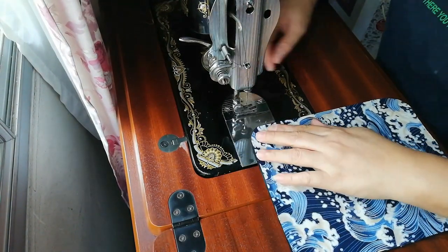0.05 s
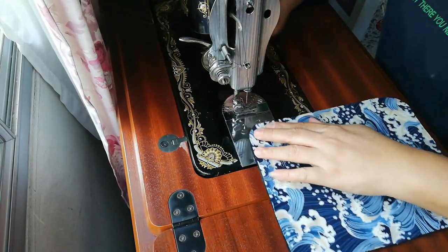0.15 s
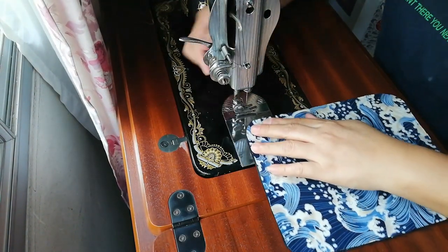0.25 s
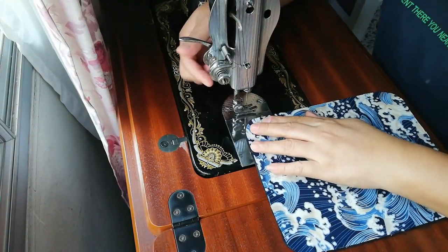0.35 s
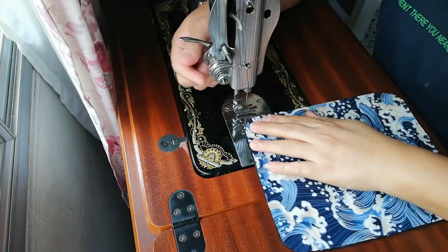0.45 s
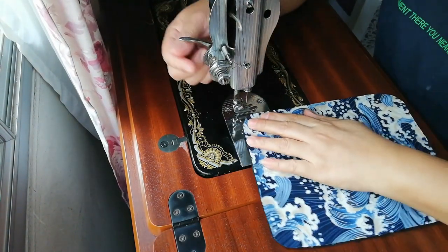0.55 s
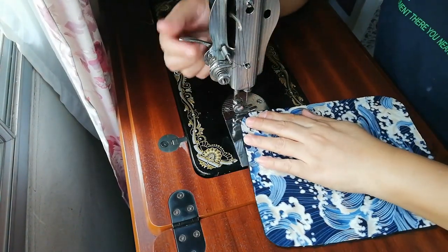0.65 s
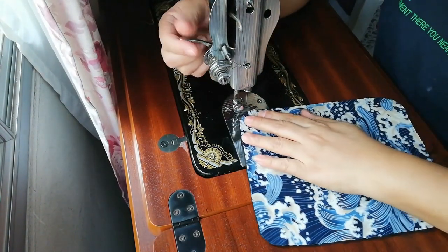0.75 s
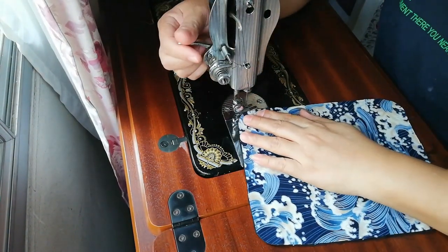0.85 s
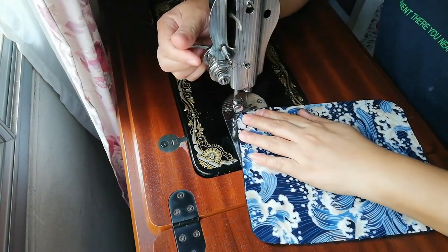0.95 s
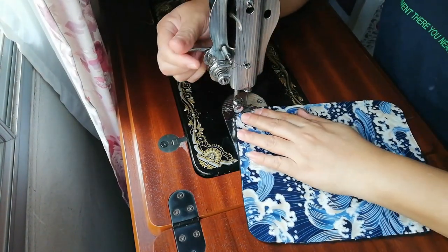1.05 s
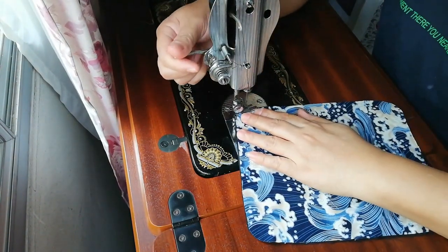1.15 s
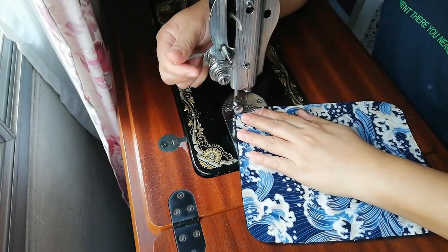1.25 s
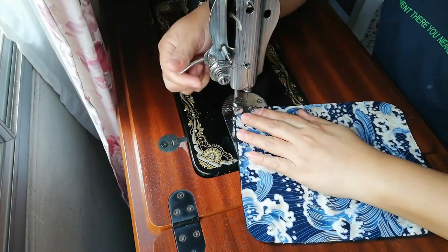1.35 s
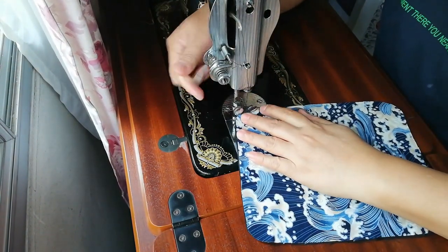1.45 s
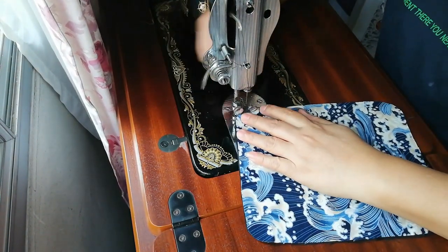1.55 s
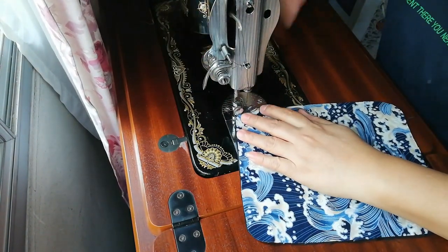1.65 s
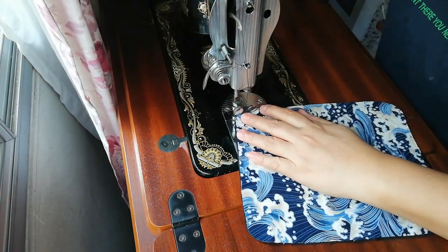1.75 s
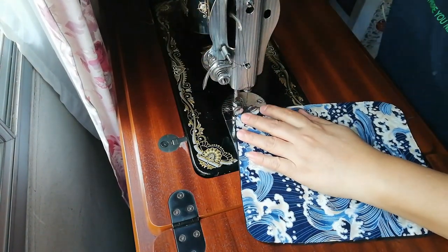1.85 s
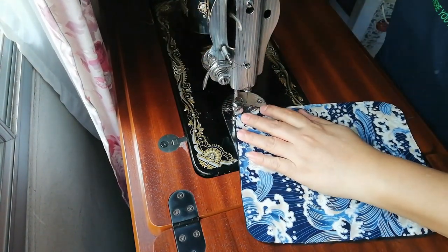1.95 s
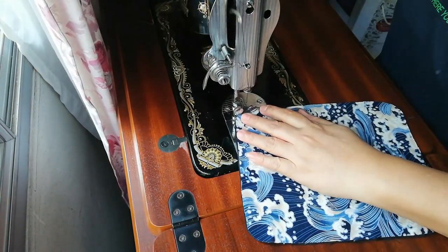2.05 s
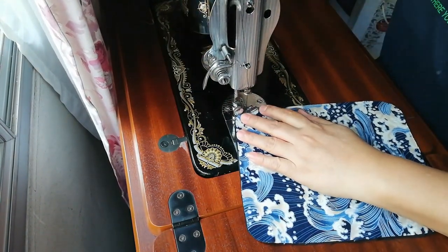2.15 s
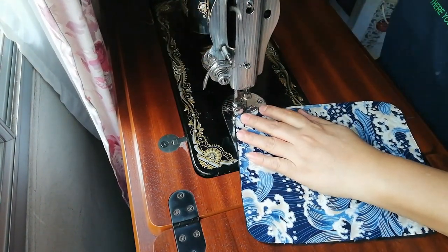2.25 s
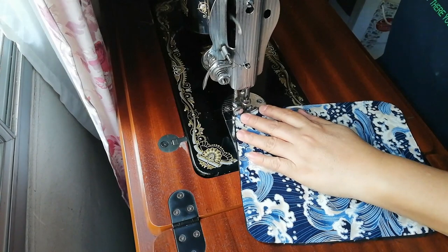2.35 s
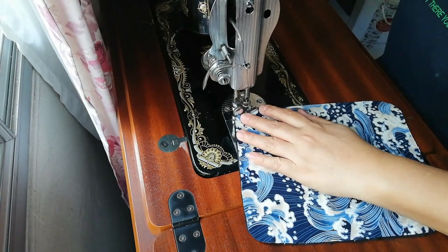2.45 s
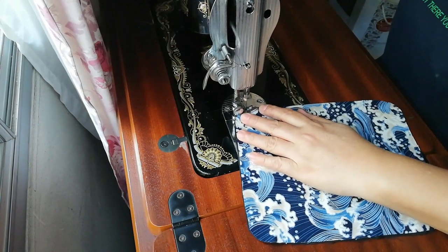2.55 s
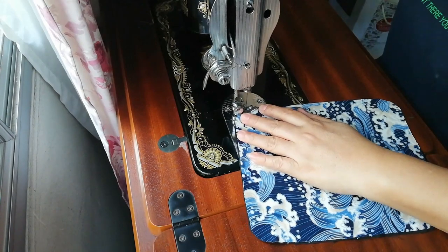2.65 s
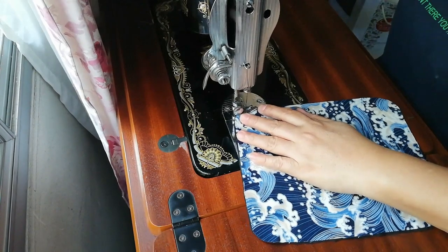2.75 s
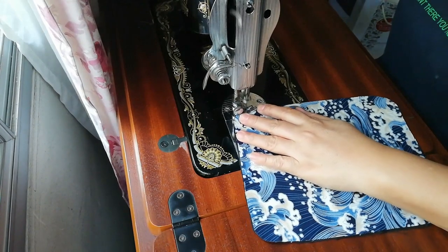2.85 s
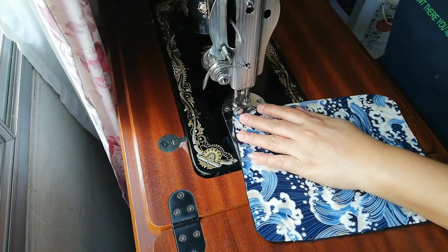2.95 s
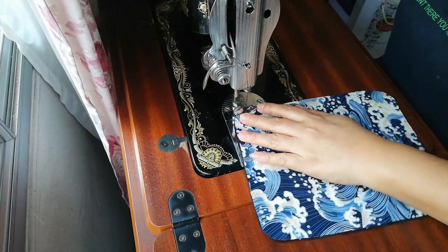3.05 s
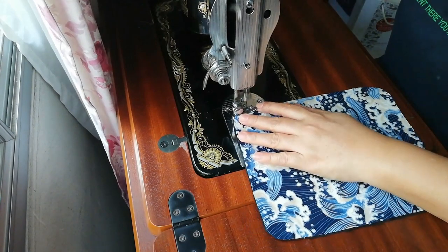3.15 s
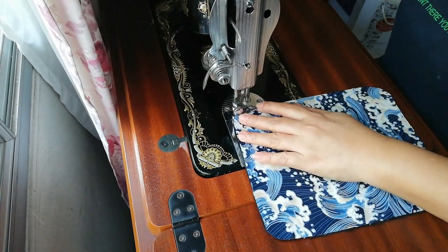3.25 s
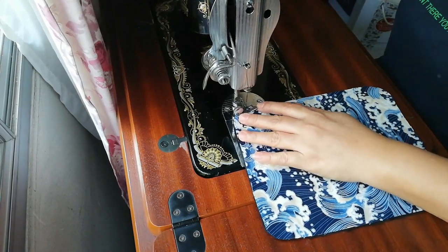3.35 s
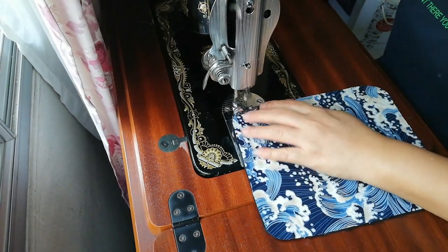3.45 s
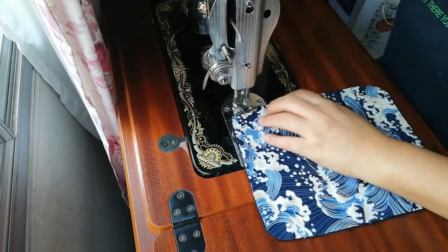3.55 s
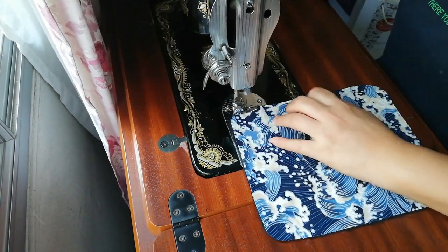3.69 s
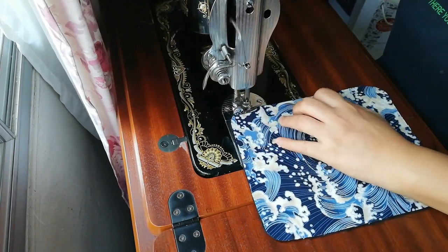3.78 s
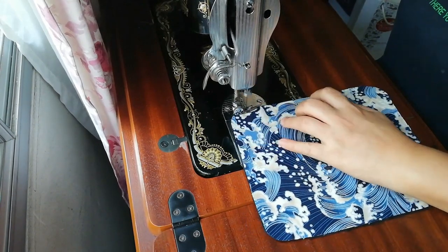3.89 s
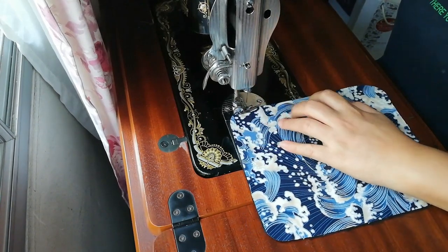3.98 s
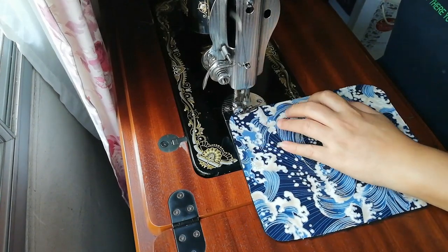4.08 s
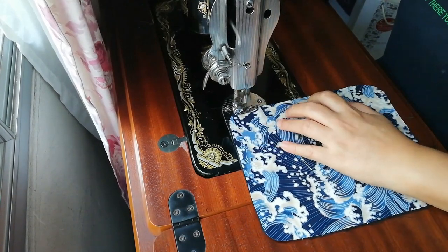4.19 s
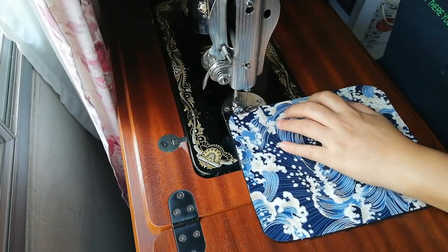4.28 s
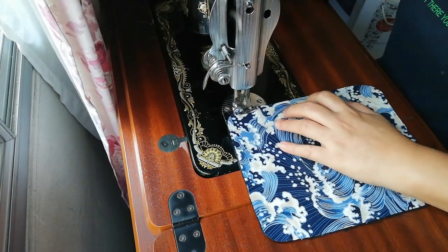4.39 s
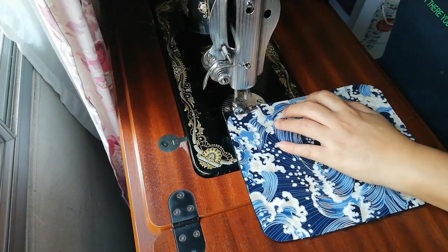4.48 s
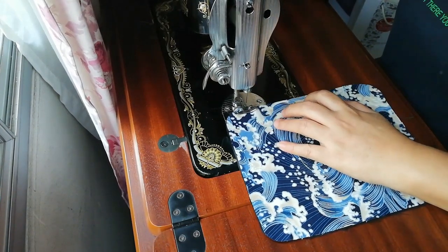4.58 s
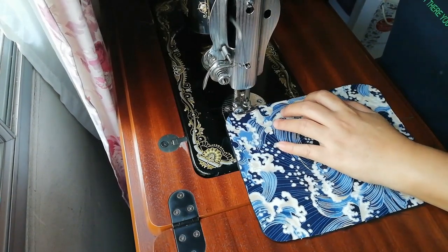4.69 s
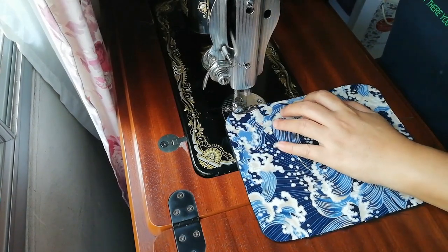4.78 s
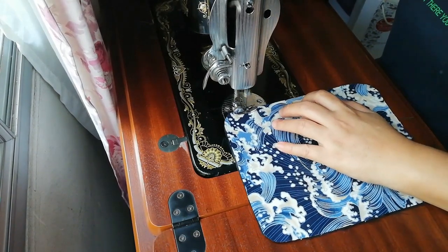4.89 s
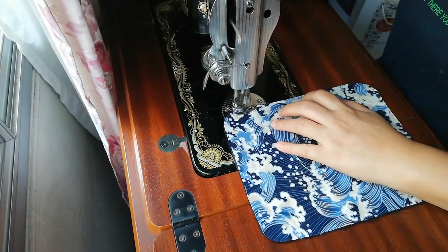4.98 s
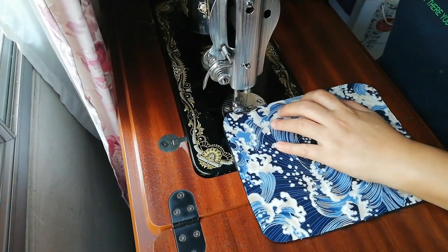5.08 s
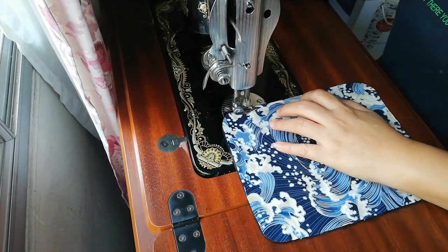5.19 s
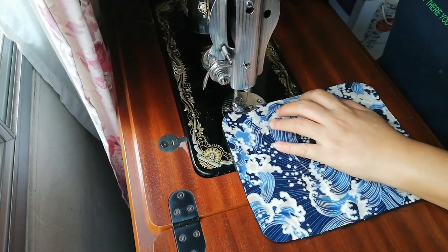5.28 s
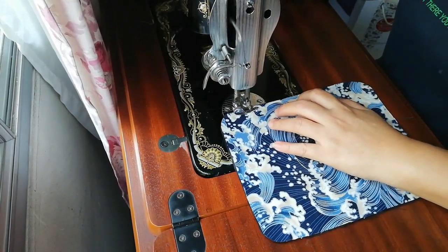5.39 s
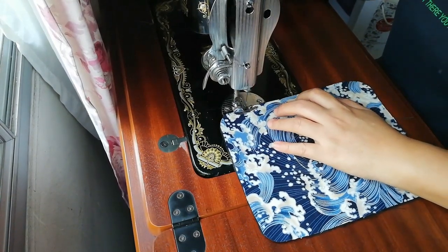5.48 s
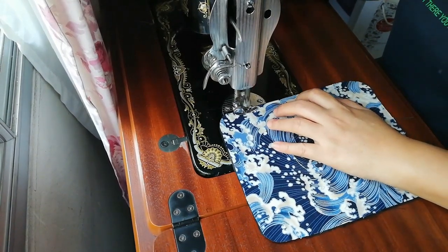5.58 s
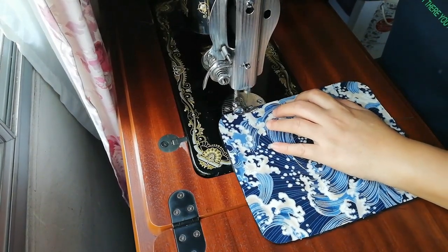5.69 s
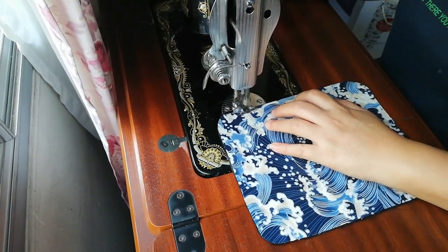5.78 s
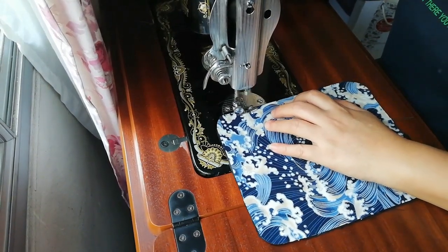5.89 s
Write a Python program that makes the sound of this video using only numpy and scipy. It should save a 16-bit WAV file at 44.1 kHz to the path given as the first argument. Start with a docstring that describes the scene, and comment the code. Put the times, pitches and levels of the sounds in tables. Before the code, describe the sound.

A quiet room with a steady soft hush and two low wavering hums, heard close in stereo. From 0 to 1.3 s a hand feels for a lever on an old iron sewing machine: a small tap at 0.5 s, a light brush near 0.7 s, faint ticks around 1.2 s. A tiny squeak leads to a loud, sharp metal clack at 1.46 s, with a weaker bounce at 1.54 s and a short ring. Near-silence follows until about 2.2 s, when the mechanism starts with faint, separate knocks and soft rasps. From 3 s the strokes become clear, bright metallic clicks and scratchy thread rasp over dull wooden thuds, about three stitches every second. The pace quickens and the clatter grows louder and brighter, reaching about five stitches a second after 5 s. Deep stand rumble swells underneath, with jolts near 3.3 and 5.2 s. The machine is still running at the end, near 5.9 s.

```python
"""An old cast-iron treadle sewing machine on a wooden table gathers speed, heard close by two microphones.
Its stitches are metal knocks and a rasp of thread and shuttle: rough noise and clicks that set metal ringing.
The table thuds underneath: low noise drives the resonances of the wood, and the stand shakes deeper still.
Before that a hand feels for the presser lever and drops it with a clack and a bounce: noise and fading tones.
Behind it all lies a quiet room: a steady hush of noise and two wavering hums."""
import sys
import numpy as np
from scipy import signal
from scipy.fft import rfft, irfft, next_fast_len
from scipy.io import wavfile

SR = 44100
rng = np.random.default_rng(int(sys.argv[2]) if len(sys.argv) > 2 else 0)


def store_pcm(level_fs):
    """Save levels as 16-bit WAV."""
    pcm = np.round(np.clip(level_fs, -1, 1) * 32767).astype(np.int16)
    wavfile.write(sys.argv[1], SR, np.atleast_2d(pcm).T)


N = 261513   # length of the scene in samples
STEP = 16   # samples between envelope points

# equally strong noise at every pitch: (frequency [Hz], level per Hz [dB])
WHITE = [(20, 0), (20000, 0)]
# how alike left and right are for sounds close by: (frequency [Hz], likeness [-1 to 1])
NEAR_ALIKE = [(60, .995), (130, 1), (330, 0.94), (560, 0.03), (1170, 0.8), (2000, 0.082), (3100, 0.068),
              (15000, 0.033)]
# strokes of the stitch cycle: (time of the top [s], kind, rasp [dB], iron arm against the rasp [dB],
# thud in the table [dB], upper table modes against the low ones [dB]); each part's gain comes on top
STROKES = [(2.27, "down", -62, -5, -52.5, -5.5), (2.553, "up", -51, -11, -56, -7),
           (2.736, "down", -45.5, -6.5, -50, 2.5), (2.941, "up", -51.5, -11, -47.5, -5),
           (3.0, "pull", -56, -10, -66, -3), (3.072, "down", -39, -6.5, -53, 9),
           (3.204, "pull", -47.5, -25, -52, 2.5), (3.265, "up", -44, -0.5, -44.5, 8.5),
           (3.383, "down", -39.5, -11, -47, 5.5), (3.512, "up", -47.5, -6, -52, 1.5),
           (3.57, "pull", -52, -24, -57, -1), (3.645, "pull", -57, 5, -67, 0),
           (3.685, "down", -36.5, -9.5, -45.5, 0.5), (3.821, "up", -50.5, -5, -44.5, 3),
           (3.96, "pull", -55, -0.5, -57.5, 4), (4.01, "down", -39, -12.5, -52.5, 4.5),
           (4.175, "up", -66, -18, -48, -6.5), (4.319, "down", -36, -12.5, -52.5, 6.5),
           (4.45, "up", -51.5, -6, -41, -3.5), (4.501, "pull", -45, -14, -54, -3),
           (4.588, "down", -37.5, -7.5, -41, 3), (4.736, "up", -44.5, -11, -43, -3.5),
           (4.866, "down", -35.5, -12, -43, 0), (4.974, "up", -44, -6, -43, 2),
           (5.081, "down", -33.5, -10.5, -44, 6.5), (5.186, "up", -40.5, -15, -44, 5.5),
           (5.232, "pull", -50.5, 1.5, -49, 5), (5.295, "down", -33, -12, -43, 6.5),
           (5.396, "up", -44, -5, -45, 6), (5.432, "pull", -49.5, -4.5, -47, -7),
           (5.499, "down", -35, -11, -40, -2.5), (5.58, "up", -39.5, -4, -43, 7),
           (5.684, "down", -35, -9.5, -37.5, -2.5), (5.766, "up", -41.5, -3, -45, 10),
           (5.865, "down", -33.5, -11, -39.5, -0.5), (5.927, "up", -45, -9, -49, 1.5)]


def amp(db):
    """Turn dB into a gain."""
    return 10 ** (np.asarray(db, float) / 20)


def rms_one(x):
    """Scale a sound to rms 1."""
    return x / np.sqrt(np.mean(x ** 2) + 1e-30)


def at_hz(points, hz):
    """Read a table between its points on a log-frequency axis."""
    table_hz, values = np.array(points).T
    return np.interp(np.log(hz), np.log(table_hz), values)


def noise(spectrum, alike):
    """Stereo noise of a given colour and left-right likeness, rms 1 overall."""
    size = next_fast_len(N)
    hz = np.maximum(np.fft.rfftfreq(size, 1 / SR), 1)
    mid, side = rfft(rng.standard_normal((2, size)))
    likeness = np.clip(at_hz(alike, hz), -1, 1)
    # the side part enters left and right with opposite signs
    both = np.sqrt(1 + likeness) * mid + np.sqrt(1 - likeness) * side * [[1], [-1]]
    coloured = both * amp(at_hz(spectrum, hz))
    return rms_one(irfft(coloured, size)[:, :N])


def band(x, low_hz, high_hz):
    """Band-pass that leaves white noise of rms 1 at about rms 1."""
    sos = signal.butter(3, [low_hz, min(high_hz, .45 * SR)], "band", fs=SR, output="sos")
    return signal.sosfilt(sos, x) * np.sqrt(SR / 2 / (high_hz - low_hz))


def resonate(x, peaks):
    """Resonances side by side with alternating signs; none is narrower than 5 Hz."""
    out = 0
    for k, (hz, width, db) in enumerate(peaks):
        radius = np.exp(-np.pi * max(width, 5) / SR)
        feed = (1 - radius ** 2) / 2 * np.array([1, 0, -1])
        back = [1, -2 * radius * np.cos(2 * np.pi * hz / SR), radius ** 2]
        out = out + (-1) ** k * amp(db) * signal.lfilter(feed, back, x)
    return out


def swells(rows):
    """Power of every event over time: an exponential rise to its top and an exponential fall."""
    at, db, rise, fall = np.array(rows, float)[:, :4].T[:, :, None]
    ms = 1000 * (np.arange(N // STEP + 2) * STEP / SR - at)
    # rise and fall are the times in ms to cover 60 dB
    slope_db = np.where(ms < 0, 60 * ms / (rise + .01), -60 * ms / (fall + .01))
    return amp(2 * np.clip(db + slope_db, -200, 0))   # twice the dB gives power


def coarse_curve(rows):
    """Power of a level curve at the envelope points."""
    s, db = np.transpose(rows)
    points_s = np.arange(N // STEP + 2) * STEP / SR
    return amp(2 * np.interp(points_s, s, db, left=-120))[None]


def envelope(power):
    """Add up the event powers and turn them into an amplitude for every sample."""
    total = np.sqrt(power.sum(axis=0))
    return np.interp(np.arange(N) / STEP, np.arange(power.shape[1]), total)


def grain(per_s, spread_db, share):
    """Gain that jumps with every tiny slip and dies within a few milliseconds; rms 1."""
    sizes = amp(spread_db * np.minimum(rng.exponential(1, N), 4))
    slips = (rng.random(N) < per_s / SR) * sizes
    jumps = signal.lfilter([1], [1, -.975], slips + 1e-18)
    share = np.clip(share, 0, 1)
    return rms_one(1 - share + share * rms_one(jumps))


def ring(at_s, hz, db, t60):
    """One struck mode: a pure tone that starts at once and falls by 60 dB in t60 seconds."""
    t = np.maximum(np.arange(N) / SR - at_s, 0)
    return amp(db - 60 * t / t60) * np.sin(2 * np.pi * hz * t)


def struck(push, power, peaks, vary_db):
    """Every event drives each mode of a part with a strength of its own; neighbours alternate in sign."""
    strengths = amp(2 * vary_db * rng.standard_normal((len(power), len(peaks))))
    out = 0
    for k, peak in enumerate(peaks):
        drive = push * envelope(power * strengths[:, [k]])
        out = out + (-1) ** k * resonate(drive, [peak])
    return out / np.std(resonate(push, peaks))


def room():
    """Steady coloured noise makes the hush; narrow slices of noise make two wavering hums."""
    # colour of the hush: (frequency [Hz], level per Hz [dB])
    hush_colour = [(12, -26), (22, -4), (42, -13.5), (60, 1), (80, -11.5), (140, -11.5), (280, -12),
                   (330, -21), (480, -21), (1050, -23), (2100, -29.5), (4600, -32), (10000, -36),
                   (15700, -44.5)]
    # left-right likeness of the room: (frequency [Hz], likeness [-1 to 1])
    room_alike = [(60, 0.99), (130, 1), (290, 0.64), (640, -0.83), (1410, 0.014), (15000, -0.079)]
    # the hums: (frequency [Hz], width [Hz] before the 5 Hz floor, level [dB])
    hum_peaks = [(64.3, 3.5, -70.5), (143.5, 13.6, -65)]
    hush_db = -58
    white = noise(WHITE, room_alike)
    out = amp(hush_db) * noise(hush_colour, room_alike)
    for hz, width, db in hum_peaks:
        out += amp(db) * rms_one(resonate(white, [(hz, width, 0)]))
    return out


def stand_shake():
    """Treadle and belt shake the stand: deep noise that follows a level curve, with extra jolts."""
    # rumble from treadle and belt: (time [s], level [dB])
    rumble = [(2.5, -83), (2.98, -59.5), (3.6, -62.5), (3.87, -52), (4.1, -55), (4.6, -62), (4.9, -63),
              (5.4, -56), (5.78, -50.5), (5.93, -73)]
    # the treadle jolts the stand: (time [s], level [dB])
    jolts = [(3.27, -43), (4.67, -53), (5.24, -41)]
    rise_ms, fall_ms = 210, 140   # of a jolt, over 60 dB
    jolt_power = swells([(s, db, rise_ms, fall_ms) for s, db in jolts])
    # colour of the shake: (Hz, dB per Hz)
    shake = noise([(60, -22), (90, -6.5), (135, 5.5), (170, -6.0), (250, -52)], NEAR_ALIKE)
    return shake * envelope(np.vstack([coarse_curve(rumble), jolt_power]))


def table_top():
    """Each stroke pushes the wooden top with a swell of low noise, and the modes of the wood ring as a thud."""
    # thud under each kind of stroke: (time ahead of the rasp [ms], rise over 60 dB [ms], fall over 60 dB [ms])
    thud_shape = {"down": (26.9, 120, 347), "up": (17.2, 107, 266), "pull": (7.4, 170, 250)}
    # low modes of the table top: (frequency [Hz], width [Hz], level [dB])
    low_modes = [(152.8, 138, -10.5), (209, 20.2, 6)]
    # upper modes of the table top: (frequency [Hz], width [Hz], level [dB])
    upper_modes = [(283, 31, -1.5), (315, 40, 1), (376, 69, -1)]
    thuds = []
    for s, kind, rasp_db, arm_db, thud_db, upper_db in STROKES:
        ahead_ms, rise_ms, fall_ms = thud_shape[kind]
        thuds.append((s - ahead_ms / 1000, thud_db, rise_ms, fall_ms, upper_db))
    push = band(noise(WHITE, NEAR_ALIKE), 102, 640)
    low_power = swells(thuds)
    upper_power = low_power * amp(2 * np.array(thuds)[:, [4]])
    out = amp(-1.0) * struck(push, low_power, low_modes, vary_db=0.5)
    return out + amp(-5.0) * struck(push, upper_power, upper_modes, vary_db=3.0)


def tap():
    """A small tap: struck tones that die away."""
    # tones of the tap: (time [s], frequency [Hz], level [dB], fall over 60 dB [s])
    tones = [(0.48, 3160, -51.5, 0.059), (0.485, 381, -56.5, 0.38)]
    return sum(ring(*tone) for tone in tones)


def squeak():
    """The lever sticks and slips on its pivot: overtones of a steady slip rate make a faint squeak."""
    # the squeak: (start [s], end [s], slips per second [Hz], level before the overtone weights [dB])
    start, end, per_s, db = (1.36, 1.45, 1160, -69)
    t = np.arange(N) / SR
    slips = sum(np.sin(2 * np.pi * k * per_s * t) * k ** -.5 for k in range(2, 7))
    held = np.clip(np.minimum(t - start, end - t) / .01, 0, 1)   # 10 ms fades
    return amp(db) * slips * held


def lever():
    """The lever lands and bounces: each blow is a sharp noise burst, a tail and the lever's ringing modes."""
    # clack and bounce: (time [s], level [dB], rise over 60 dB [ms], fall over 60 dB [ms])
    blows = [(1.456, -21.5, 4.9, 15), (1.538, -33.5, 3.6, 41)]
    # colour of the burst and tail: (frequency [Hz], level per Hz [dB])
    burst_colour = [(120, -34), (250, -4.5), (400, -8), (520, -47), (750, -12.5), (1050, -4.5),
                    (1700, -8.5), (2530, -9.5), (4140, -7), (5900, 0), (8400, -4), (11500, -9),
                    (14900, -21), (15700, -24)]
    # modes of the lever: (frequency [Hz], fall over 60 dB [s], level in the clack [dB], in the bounce [dB])
    modes = [(330, .15, -50, -58), (1050, .07, -52, -45), (1400, .06, -50, -52), (3623, .06, -44, -54),
             (4900, .06, -46, -50), (5900, .06, -34, -52), (6185, .1, -42, -56), (7122, .08, -46, -43),
             (8398, .06, -38, -52), (11630, .05, -40, -54), (14660, .13, -42, -64)]
    tail_db, tail_ms = -12.5, 197   # head and room ring on: level against the blow, fall over 60 dB
    left_lag_s = .0003   # the left microphone hears the modes this much later
    tails = [(s, db + tail_db, rise, tail_ms) for s, db, rise, fall in blows]
    out = noise(burst_colour, NEAR_ALIKE) * envelope(swells(blows + tails))
    for hz, t60, *levels in modes:
        for blow, db in zip(blows, levels):
            out += [ring(blow[0] + lag_s, hz, db, t60) for lag_s in (left_lag_s, 0)]
    return out


def contacts():
    """List all contacts: time, level, rise, fall, then how strongly head, iron arm and shuttle ring."""
    # metal knocks: (time [s], kind, level before the part gains [dB], fall over 60 dB [ms])
    knock_times = [(2.2367, "slack", -54, 108), (2.477, "shuttle", -61, 175),
                   (2.5407, "shuttle", -46.5, 77), (2.6974, "crank", -48.5, 62),
                   (2.725, "shuttle", -45, 210), (2.8053, "hook", -38, 42), (2.9214, "slack", -46, 90),
                   (3.065, "hook", -36.5, 62), (3.175, "feed", -39.5, 110), (3.26, "crank", -58, 200),
                   (3.3501, "crank", -42, 105), (3.3618, "hook", -34, 62), (3.475, "feed", -41, 82),
                   (3.6266, "hook", -42, 65), (3.6836, "shuttle", -42.5, 120), (3.775, "feed", -40, 88),
                   (3.9417, "feed", -39, 90), (4.0066, "hook", -36.5, 135), (4.111, "feed", -44.5, 140),
                   (4.1499, "feed", -48, 160), (4.27, "needle", -35, 160), (4.2937, "crank", -40, 64),
                   (4.436, "needle", -48, 150), (4.4934, "shuttle", -39, 82), (4.5376, "needle", -34, 57),
                   (4.56, "crank", -36, 50), (4.5663, "hook", -31, 51), (4.6753, "feed", -39.5, 70),
                   (4.7107, "needle", -51, 200), (4.815, "needle", -39, 210), (4.835, "hook", -32, 32),
                   (5.0437, "needle", -32, 190), (5.0682, "hook", -29.5, 40), (5.164, "crank", -42, 35),
                   (5.2706, "needle", -30.5, 182), (5.3768, "slack", -45.5, 200),
                   (5.459, "needle", -37.5, 240), (5.4734, "hook", -28, 44), (5.6437, "needle", -32, 130),
                   (5.6573, "hook", -30, 102), (5.754, "crank", -39, 43), (5.8459, "hook", -27.5, 42),
                   (5.8906, "hook", -39, 55)]
    # what each kind of knock sets ringing: (head [dB], iron arm [dB], shuttle ring [dB])
    knock_colour = {"needle": (-7, -8, -16), "hook": (-6, -10, -2), "feed": (-5.5, -8.5, -2),
                    "shuttle": (-19, -28, 7.8), "crank": (-1.2, 1.6, -17), "slack": (3.4, -7.5, 5)}
    # rasp of needle going down, coming up and thread pulled tight:
    # (rise over 60 dB [ms], fall over 60 dB [ms], head [dB], shuttle ring [dB])
    rasp_shape = {"down": (244, 229, -3, -5.5), "up": (314, 312, -1.5, -8), "pull": (318, 256, -6, 0)}
    # fingers and cloth brushing the machine: (time of the top [s], level before the part gains [dB],
    # rise over 60 dB [ms], fall over 60 dB [ms], head [dB], iron arm [dB], shuttle ring [dB])
    touches = [(.25, -69, 1800, 1300, -4, -11, -18), (.48, -64, 3.4, 91, -6, -22, -1),
               (.67, -51.5, 5, 290, -8, -12.5, -9), (.74, -72, 360, 450, 1, -1, -13),
               (1.195, -52.5, 4.5, 51, -16, -25, 0), (1.255, -66, 4.5, 55, -11, -25, -15),
               (1.313, -59.5, 3.2, 120, 0, 4, 0)]
    knock_rise_ms = 4.0
    rows = [(s, db, knock_rise_ms, fall_ms, *knock_colour[kind]) for s, kind, db, fall_ms in knock_times]
    for s, kind, rasp_db, arm_db, thud_db, upper_db in STROKES:
        rise_ms, fall_ms, head_db, shuttle_db = rasp_shape[kind]
        rows.append((s, rasp_db, rise_ms, fall_ms, head_db, arm_db, shuttle_db))
    return np.array(rows + list(touches), float)


def mechanism():
    """Rough contact noise, with a click at each sharp contact, sets head, small parts, arm and shuttle ringing."""
    # bearings and belt between strokes: (time [s], level before the part gains [dB])
    whir = [(2.3, -73), (2.6, -69), (2.9, -54), (3.3, -57), (4.2, -55), (4.7, -62), (5.3, -54), (5.93, -55)]
    # what the whir sets ringing: (head [dB], iron arm [dB], shuttle ring [dB])
    whir_colour = (-1.1, -11, -9)
    # modes of the small steel parts: (frequency [Hz], width [Hz], level [dB])
    plate_modes = [(6000, 16.7, 1), (6650, 31, 4.5), (7370, 45, 1.5), (7880, 50, 2.5), (8550, 120, -1),
                   (9430, 60, 2.5)]
    # modes of the machine head: (frequency [Hz], width [Hz], level [dB])
    head_modes = [(1997, 185, -1), (2570, 305, -3.5), (3175, 125, 3), (3360, 300, -3.5), (4010, 125, -1),
                  (4804, 300, -2.5)]
    # modes of the iron arm: (frequency [Hz], width [Hz], level [dB])
    arm_modes = [(637, 37, -20), (791.4, 32, -5), (970, 32, -6.5), (1059, 54, -7.5), (1380, 39, -6)]
    # modes of the shuttle: (frequency [Hz], width [Hz], level [dB])
    shuttle_modes = [(10720, 90, -2), (10950, 70, 1.5), (11120, 110, -1), (10900, 600, -6),
                     (12830, 650, -21)]

    rows = contacts()
    power = np.vstack([swells(rows), coarse_curve(whir)])
    colour = np.vstack([rows[:, 4:], whir_colour])
    head, arm, shuttle = (power * amp(2 * colour[:, [k]]) for k in range(3))
    level = envelope(power)

    sharp = rows[:, 2] < 10   # contacts that rise in under 10 ms
    at = np.round(rows[sharp, 0] * SR).astype(int) + STEP
    clicks = np.zeros((2, N))
    clicks[0, at + 2] = clicks[1, at] = amp(14.5)   # left comes two samples later

    fine = grain(per_s=1600.0, spread_db=3.0, share=.29)   # small parts slip often
    coarse = grain(per_s=150.0, spread_db=4.0, share=.35)   # the castings chatter in fewer, bigger grains
    # each part is rubbed at a place of its own
    steel, air, rings = (noise(WHITE, NEAR_ALIKE) * fine + clicks for part in range(3))
    iron, iron_rings = (noise(WHITE, NEAR_ALIKE) * coarse + clicks for part in range(2))

    out = amp(-4.5) * band(steel * level, 5580, 11800)
    out += amp(-10.5) * struck(rings, power, plate_modes, vary_db=4.0)
    bright_level = level * (level / amp(-36)) ** .5   # harder contacts are brighter
    out += amp(-16.0) * band(air * bright_level, 13000, 16000)
    out += amp(-4.0) * band(iron * envelope(head), 1370, 4630)
    out += amp(-5.0) * struck(iron_rings, head, head_modes, vary_db=4.0)
    out += amp(-1.5) * band(iron * envelope(arm), 582, 1530)
    out += amp(-2.5) * struck(iron_rings, arm, arm_modes, vary_db=3.5)
    return out + amp(-6.0) * struck(rings, shuttle, shuttle_modes, vary_db=2.0)


def scene():
    """Room, stand, table, lever and hands, and the machine itself, added together."""
    before_drop = tap() + squeak()
    return room() + stand_shake() + table_top() + before_drop + lever() + mechanism()


def record(dry):
    """The two microphones colour the treble differently; the very top is cut."""
    # left microphone against the right: (frequency [Hz], level [dB])
    left_over_right = [(500, 0.0), (1200, 0), (4500, 0), (5800, -0.5), (8500, 2), (10000, -0.5),
                       (11500, -11.5), (15000, -2.5)]
    cutoff_hz = 15950
    hz = np.linspace(1, SR / 2, 257)
    out = []
    for x, sign in zip(dry, (.5, -.5)):   # each side takes half of the difference
        taps = irfft(amp(sign * at_hz(left_over_right, hz)))
        taps = np.roll(taps, 256) * np.hanning(513)[:512]
        out.append(signal.fftconvolve(x, taps)[256:256 + N])   # skip the filter's delay
    top_cut = signal.cheby2(16, 60, cutoff_hz, fs=SR, output="sos")
    return signal.sosfilt(top_cut, np.array(out))


dry = scene()
out = record(dry)
store_pcm(out)
```